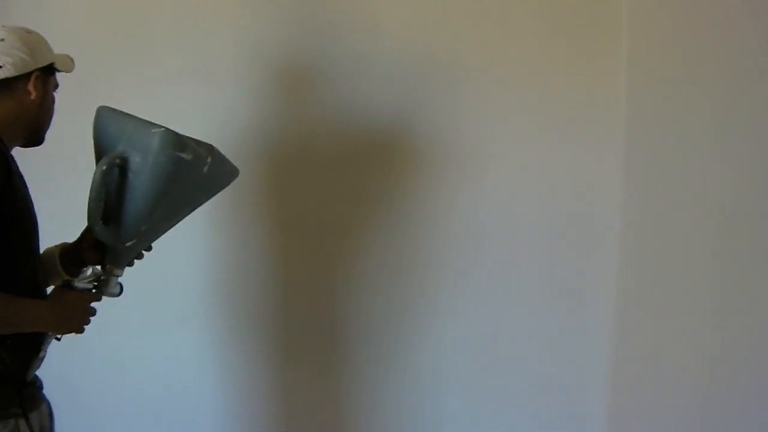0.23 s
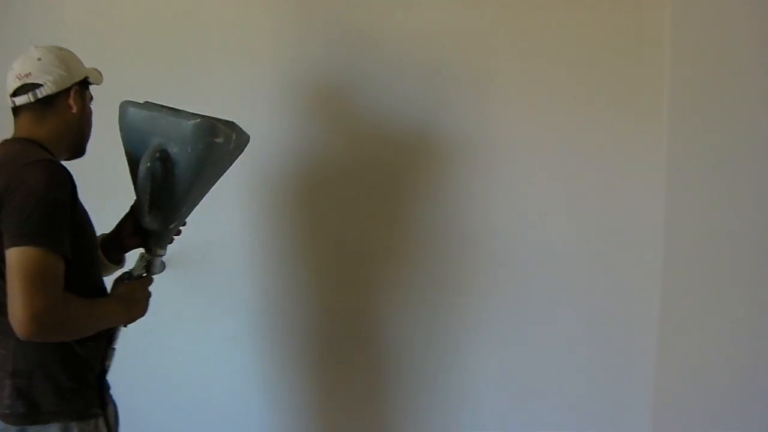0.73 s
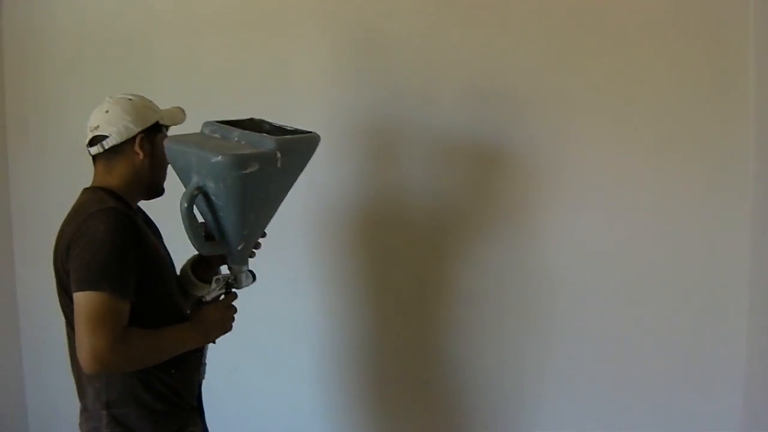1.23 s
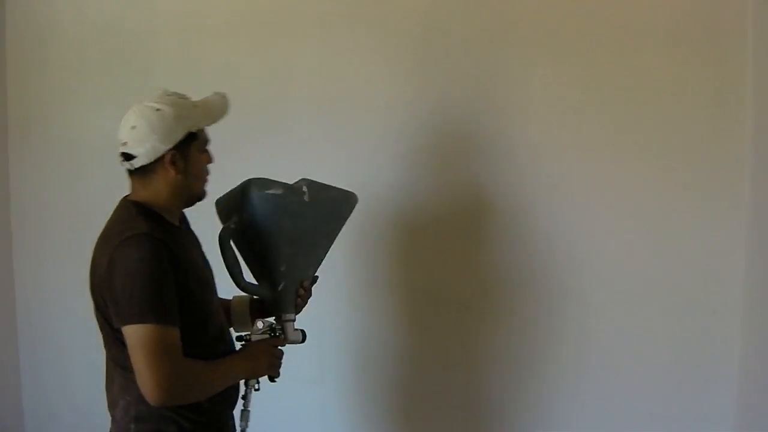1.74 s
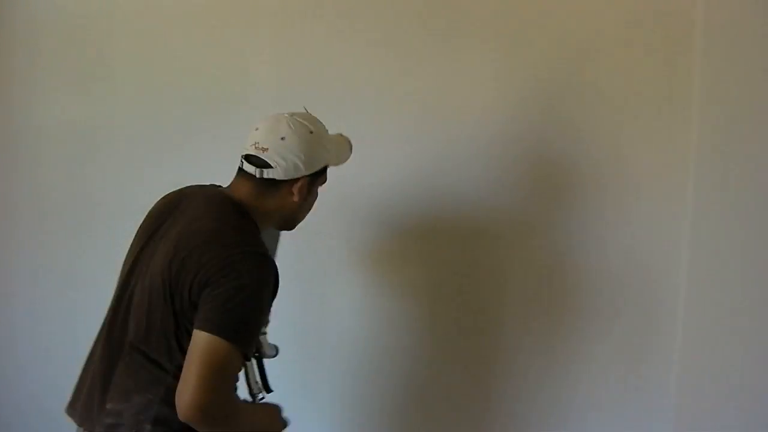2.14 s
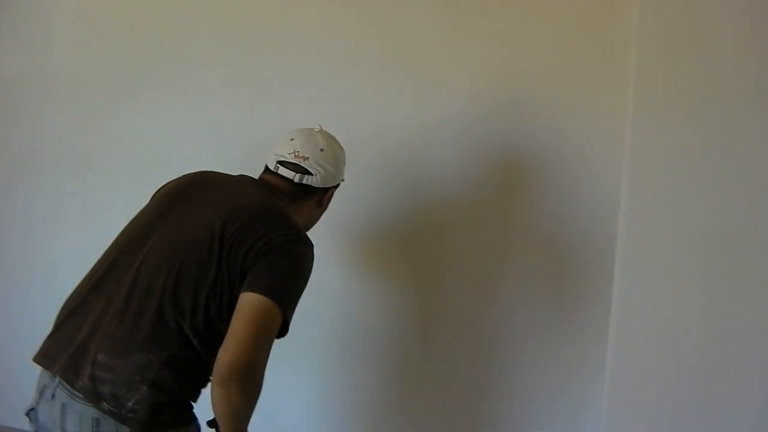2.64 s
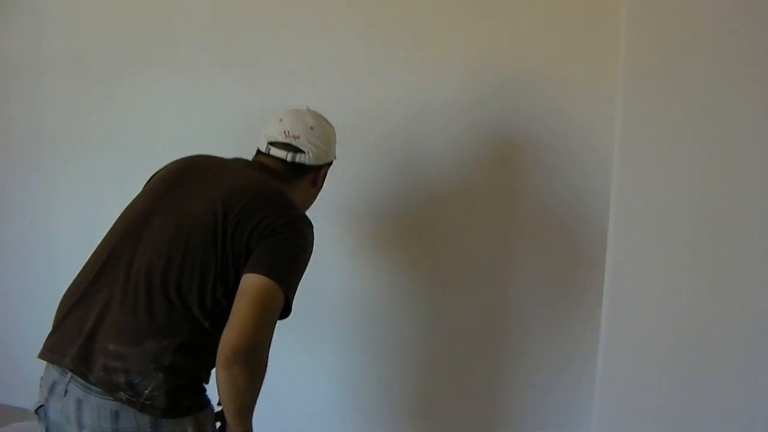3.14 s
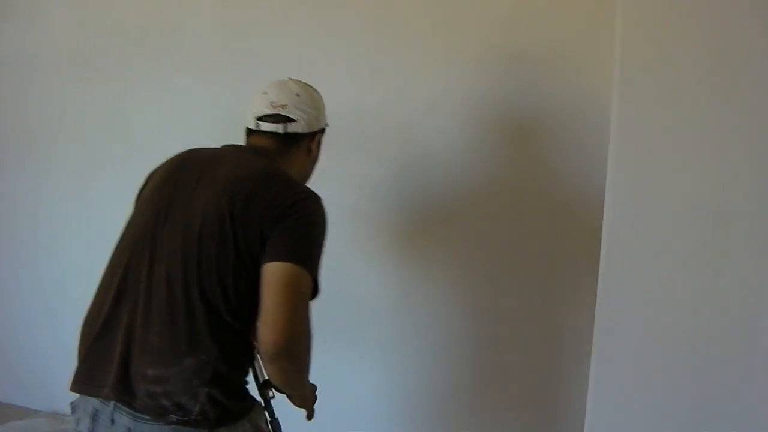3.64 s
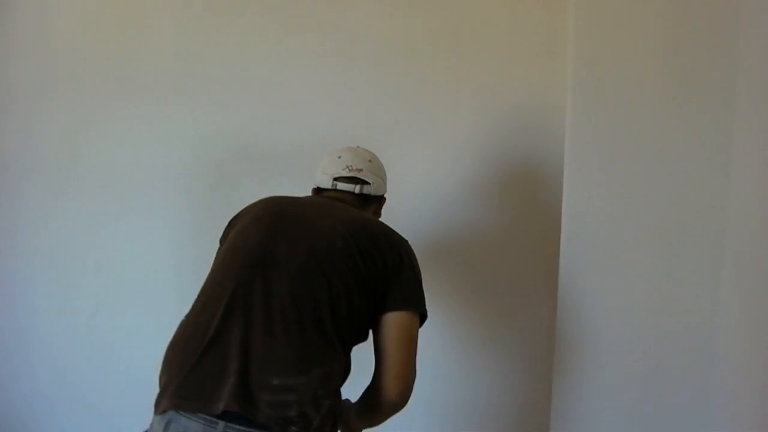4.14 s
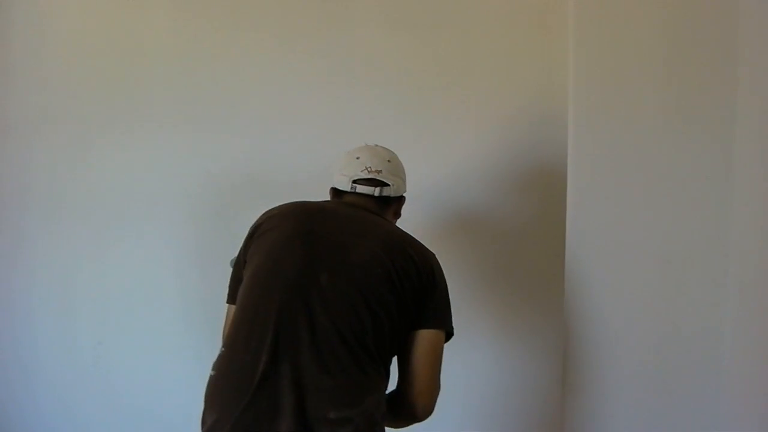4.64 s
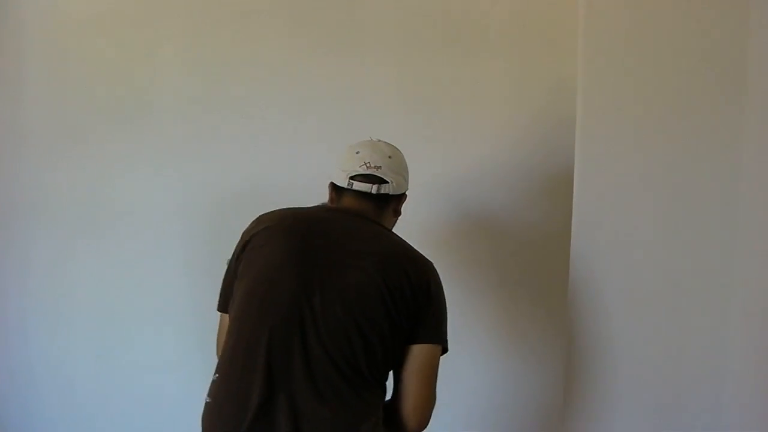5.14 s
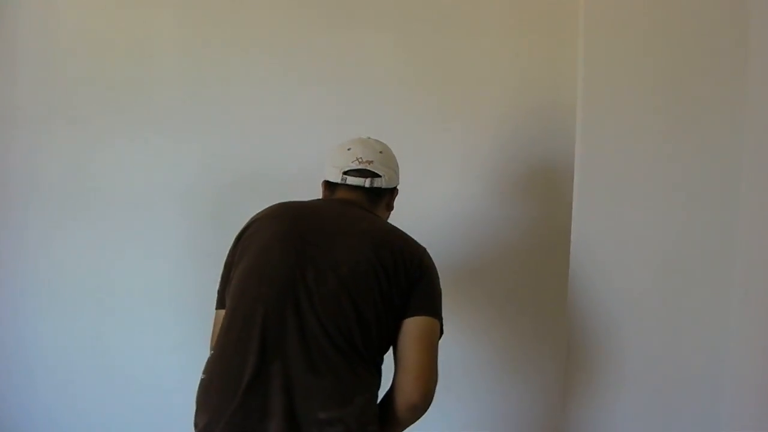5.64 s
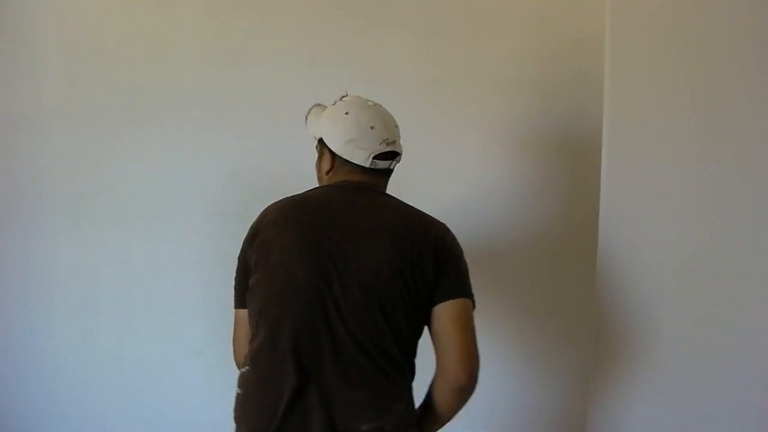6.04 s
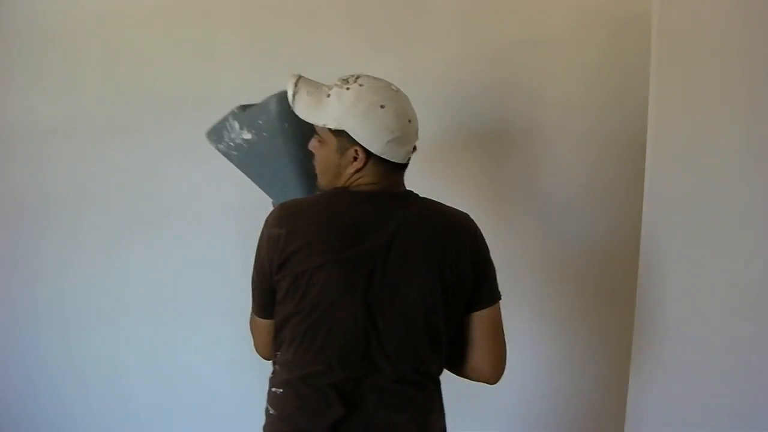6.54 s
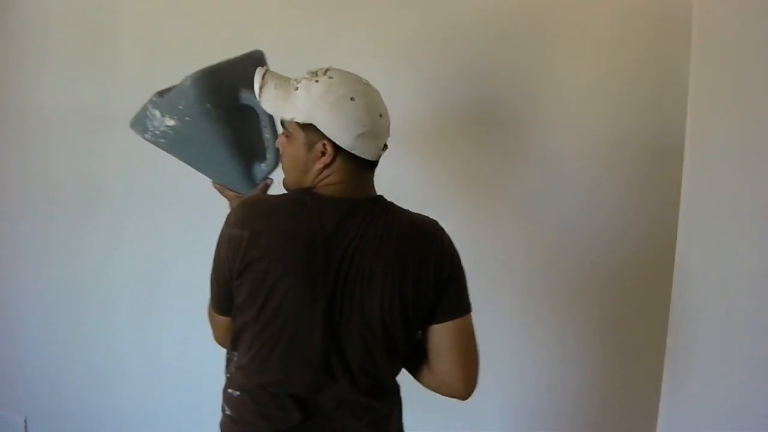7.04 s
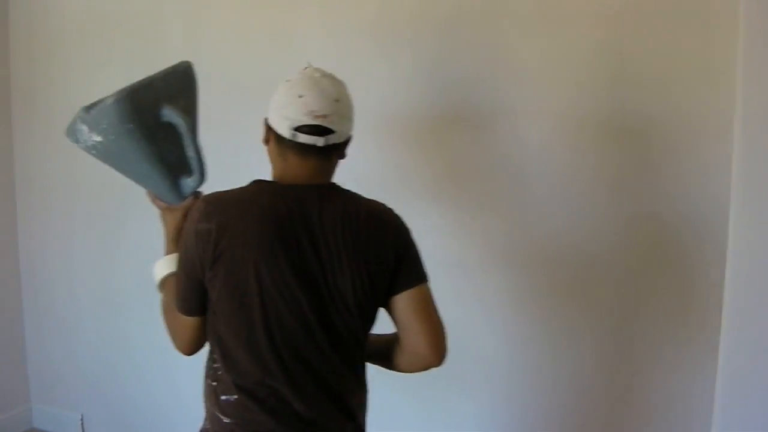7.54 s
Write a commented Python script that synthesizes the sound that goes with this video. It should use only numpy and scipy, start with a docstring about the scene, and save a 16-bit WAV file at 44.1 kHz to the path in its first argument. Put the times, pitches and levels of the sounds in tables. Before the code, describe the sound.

Compressed air hisses loudly from a texture spray gun in a bare echoing room, roughening with each trigger pull, then cutting off with a clunk.

```python
"""A rough rush falls back to a hiss: a hopper gun is spraying drywall texture in a bare room, a few steps away.
Compressed air hisses from the nozzle as shaped noise; each trigger pull adds mud, a fuller and rougher noise.
Mud left in the nozzle thins the hiss until the air has blown it clear, and fuzzy tones whistle now and then.
Bumps of the plastic hopper scuff and ring; at last the air valve shuts with a clunk and the room rings out.
A patchy, very faint low rumble and a faint steady hiss lie underneath."""
import sys
import numpy as np
from scipy import signal
from scipy.fft import rfft, irfft, next_fast_len
from scipy.io import wavfile

SR = 44100
rng = np.random.default_rng(int(sys.argv[2]) if len(sys.argv) > 2 else 0)


def dump(signal):
    """Clip the signal to [-1, 1] and save it as 16-bit WAV at the path in sys.argv[1]."""
    limited = np.clip(np.atleast_2d(signal).T, -1, 1)
    pcm = np.round(limited * 32767).astype(np.int16)
    wavfile.write(sys.argv[1], SR, pcm)


N = 343539

# Pulls of the trigger: start t/s, release t/s, mud flow level/dB, air spurt at the start level/dB
TRIGGER_PULLS = [(-.2, 0, 3.5, 10), (0.557, 1.078, -1, 1), (4.425, 4.86, -.3, 1.5),
                 (5.147, 5.784, -1.65, 1.5)]
# The jet's hiss without its crest: f/Hz, level/dB per Hz
AIR_SPECTRUM = [(100, -47), (260, -40), (380, -29.5), (700, -29.5), (1100, -26.5), (1900, -21.5),
                (2900, -16.5), (4300, -14.5), (5600, -10.5), (7100, -4.5), (10500, -3.5), (15000, -4)]
# Mud being torn into droplets: f/Hz, level/dB per Hz
MUD_SPECTRUM = [(100, -48), (260, -33.5), (400, -26.5), (1100, -23), (2100, -13.5), (3200, -11.5),
                (4600, -5), (6300, -0.5), (7500, -1.5), (9000, -5.5), (11500, -6), (14500, -5)]
# The worker carries the gun along the wall: t/s, change of the hiss level/dB, left minus right level/dB
WALK_ALONG_WALL = [(0, 0.4, 0.2), (2, 0, 0), (4, -0.36, -0.1), (5.3, -0.3, 0), (5.7, 0, 0.2),
                   (7.2, -0.2, .5)]
# Fuzzy tones of air in the nozzle and hopper throat: middle t/s, half-length t/s, f/Hz, spread f/Hz, level/dB
WHISTLE_TONES = [(3.7, 0.35, 493, 20, -63.5), (4.9, 0.096, 388, 17, -57.5), (5.55, 0.48, 396, 9.2, -62.5),
                 (6.353, 0.21, 1602, 350, -52), (7.104, 0.1, 2650, 200, -51),
                 (7.206, 0.037, 2950, 110, -44)]
# What the gun rings with as the valve shuts: f/Hz, level/dB, time to fall by 60 dB t/s
CLUNK_RINGS = [(199, -72, 1), (328, -59, 1.4), (500, -61, .9), (654, -65, .9), (2890, -45, .2)]
# Knocks on the gun: bumps of the hopper, and at the end the clunk of the valve:
# t/s, level/dB, hardness as contact noise level/dB
KNOCKS = [(2.271, -71, 9), (3.879, -50, 3), (4.192, -43, -12), (4.239, -47, -14), (4.28, -47, -18),
          (7.15, -63.5, 21.5), (7.169, -57, 20), (7.199, -57.5, 17), (7.217, -64, 18)]
# Ringing tones of a knock: f/Hz, level/dB, time to fall by 60 dB t/s
KNOCK_RINGS = [(151, -21, 0.12), (290, -16, 0.11), (329, -19, .7), (340, -3, 0.14), (374, -6, 0.1),
               (531, -15, 0.23), (652, -20, .3), (844, -21, 0.17)]
# Dull contact noise of a knock: f/Hz, level/dB per Hz
CONTACT_SPECTRUM = [(30, -24), (70, -17), (150, -8), (330, 0), (600, -0.5), (900, -2.5), (1600, -4.5),
                    (2500, 0.5), (4000, -8), (9000, -35)]
# Patchy low rumble: f/Hz, level/dB per Hz
LOW_RUMBLE_SPECTRUM = [(15, -32), (30, 10.5), (48, -5), (75, 7), (130, 7), (200, 0.5), (400, -32),
                       (1500, -68)]
# Faint steady background: f/Hz, level/dB per Hz
BACKGROUND_SPECTRUM = [(30, -28), (75, -15), (150, -11), (260, -18), (450, 1.5), (800, -3.5), (15500, -5.5)]
# How long the room rings: f/Hz, time to fall by 60 dB t/s
ROOM_DECAY = [(100, 0.94), (400, 1), (1500, 0.96), (4000, 0.87), (7000, 0.7), (10000, 0.57), (15000, 0.36)]
# Difference between the two microphones: f/Hz, side minus mid level/dB
STEREO_WIDTH = [(60, -9), (200, -9.5), (380, -10.5), (700, -13.5), (1400, -14), (2400, -14), (4400, -8.6),
                (8000, -4.2), (14000, -3.8)]

PULL_S, RELEASE_S, SPURT_S = 0.058, 0.12, 0.17  # mud flow starts, stops; half-length of the air spurt
JET_DB, MUD_DB = -18, -17.5  # air through a clean nozzle; mud at a flow of 1
COAT_S, CLEAR_S = 0.16, 1.07  # mud coats the nozzle quickly and is blown off slowly
CLEAN_CREST_HZ, COATED_CREST_HZ = 7440, 8350  # a narrower opening hisses higher
COATED_DB, COATED_BODY_DB = -4, -1.7  # and more weakly
CREST_WIDTH_HZ, CREST_DB = 850, 4
BODY_HZ, BODY_WIDTH_HZ = 2900, 1700
SHUT_S, SHUT_FALL_DB = 7.184, 225  # the valve closes; the hose empties at this many dB a second
BACKGROUND_DB = -58.5
TREBLE_LIMIT_HZ = 15770

TIME = np.arange(N) / SR
FRAME_S = np.arange(N // 128 + 5) * 128 / SR  # times of the short frames that shape the hiss
BIN_HZ = np.fft.rfftfreq(512, 1 / SR)  # frequencies within each frame


def air_jet(flutter_db=0.8, choke_db=1.4, choke_body_db=2):
    """Turbulent hiss that spurts as the trigger is pulled; mud in the nozzle makes it higher and thinner."""
    coat, flow = coating(), mud_flow()
    frame_coat = np.interp(FRAME_S, TIME, coat)[:, None]
    frame_flow = np.interp(FRAME_S, TIME, flow)[:, None]
    crest_hz = CLEAN_CREST_HZ + (COATED_CREST_HZ - CLEAN_CREST_HZ) * frame_coat
    body_db = COATED_BODY_DB * frame_coat - choke_body_db * frame_flow
    shape_db = CREST_DB * hump(crest_hz, CREST_WIDTH_HZ) + body_db * hump(BODY_HZ, BODY_WIDTH_HZ)
    # Random frames are shaped one by one, then overlapped into a continuous hiss
    real, imag = rng.standard_normal((2,) + shape_db.shape)
    frames = (real + 1j * imag) * amp(shape_db)
    hiss = signal.istft(frames.T, noverlap=384)[1][:N]
    spurt_db = np.zeros(N)
    for start, _, _, db in TRIGGER_PULLS:
        spurt_db += db * np.exp(-((TIME - start - PULL_S) / SPURT_S) ** 2)
    level_db = JET_DB + at_time(WALK_ALONG_WALL, TIME) + COATED_DB * coat - choke_db * flow + spurt_db
    return unit(colour(hiss, AIR_SPECTRUM)) * amp(level_db + flutter_db * wander(hz=25))


def mud_spray(sputter_db=1.5):
    """Mud reaches the jet in uneven lumps and is torn apart."""
    lumps = unit(noise(MUD_SPECTRUM) * amp(sputter_db * wander(hz=44.6)))
    return amp(MUD_DB) * mud_flow() * lumps


def pull(start, stop):
    """Mud flow of one trigger pull: it rises, holds and falls away."""
    rise = np.clip((TIME - start) / PULL_S, 0, 1)
    fall = np.clip(1 - (TIME - stop) / RELEASE_S, 0, 1)
    return rise * fall


def mud_flow():
    """Flow of mud into the jet over all pulls; a pull at 0 dB reaches 1."""
    return sum(amp(db) * pull(start, stop) for start, stop, db, _ in TRIGGER_PULLS)


def coating():
    """Mud in the nozzle, 0-1: it builds up during each pull and clears after it."""
    coats = []
    for start, stop, _, _ in TRIGGER_PULLS:
        build = 1 - np.exp(-np.maximum(TIME - start, 0) / COAT_S)
        clear = np.exp(-np.maximum(TIME - stop - RELEASE_S, 0) / CLEAR_S)
        coats.append(build * clear)
    return np.max(coats, axis=0)


def valve():
    """Air pressure as a gain: full until the valve shuts, then draining away."""
    return amp(-SHUT_FALL_DB * np.maximum(TIME - SHUT_S, 0))


def whistles():
    """Air catches an edge of the nozzle and briefly sings in a fuzzy band."""
    out = np.zeros(N)
    for middle, half_length, hz, spread_hz, db in WHISTLE_TONES:
        tone = unit(wander(hz=spread_hz) * np.cos(2 * np.pi * hz * TIME))
        out += amp(db) * tone * np.exp(-((TIME - middle) / half_length) ** 2)
    return out


def clunk(lead_s=0.008):
    """The valve snaps onto its seat, just before the pressure falls, and the gun rings in fading tones."""
    t = np.maximum(TIME - SHUT_S + lead_s, 0)
    return sum(amp(db - 60 * t / t60) * np.sin(2 * np.pi * hz * t) for hz, db, t60 in CLUNK_RINGS)


def knocks(contact_t60=0.082, give_s=0.0035):
    """Each knock on the gun is a short scuff with fading ringing tones; it starts softly."""
    out, t = np.zeros(N), np.arange(SR // 2) / SR
    ring = sum(amp(db - 60 * t / t60) * np.sin(2 * np.pi * hz * t) for hz, db, t60 in KNOCK_RINGS)
    soft_start = 1 - np.exp(-t / give_s)
    for s, db, hard_db in KNOCKS:
        contact = unit(colour(rng.standard_normal(len(t)), CONTACT_SPECTRUM))
        scuff = contact * amp(-60 * t / contact_t60)
        add(out, s, amp(db) * (ring + amp(hard_db) * scuff) * soft_start)
    return out


def low_rumble(level_db=-72.5, rush_db=7, swell_db=7, fade_db_per_s=20):
    """Patchy low rumble, very faint, louder during the rushes and fading after the valve shuts."""
    swells = np.minimum(wander(hz=7.3), 1)
    patches = unit(noise(LOW_RUMBLE_SPECTRUM) * amp(swell_db * swells))
    fade_db = fade_db_per_s * np.maximum(TIME - SHUT_S, 0)
    return patches * amp(level_db + rush_db * mud_flow() - fade_db)


def background():
    """Faint steady noise with a fixed spectrum."""
    return amp(BACKGROUND_DB) * noise(BACKGROUND_SPECTRUM)


def echoes():
    """Dense reflections off bare walls; the treble dies first, but every band carries equal energy."""
    hz, t, grains = signal.stft(rng.standard_normal(SR * 3 // 4), SR, nperseg=256)
    t60 = at_hz(ROOM_DECAY, hz)[:, None]
    tail = signal.istft(grains * amp(-60 * t / t60) / np.sqrt(t60))[1]
    return tail / np.linalg.norm(tail)


def plume_in_room(x, direct_db, count=10):
    """Mid and side of the spray; the plume keeps shifting, so one echo pattern fades quickly into the next."""
    turns = TIME / 0.04  # a new pattern fades in every 0.04 s
    mid, side = amp(direct_db) * x, np.zeros(N)
    for k in range(count):
        visit, place = np.divmod(turns + k, count)
        # A random sign each time a pattern comes round keeps it from simply repeating
        signs = rng.choice([-1, 1], int(visit[-1]) + 1)
        polarity = signs[visit.astype(int)]
        here = x * polarity * np.sin(np.pi / 2 * np.minimum(place, 2))
        mid = mid + signal.oaconvolve(here, echoes())[:N]
        side += signal.oaconvolve(here, echoes())[:N]
    return np.array([mid / np.sqrt(1 + amp(direct_db) ** 2), colour(side, STEREO_WIDTH)])


def body_in_room(x, echo_db):
    """Mid and side of a compact source, such as the gun's body, with one steady echo pattern."""
    mid = x + amp(echo_db) * signal.oaconvolve(x, echoes())[:N]
    side = signal.oaconvolve(x, echoes())[:N]
    return np.array([mid, colour(side, STEREO_WIDTH)])


def amp(db):
    """Turns decibels into gain."""
    return 10 ** (np.asarray(db) / 20)


def unit(x):
    """Scales a sound to an rms of 1."""
    return x / np.sqrt(np.mean(x ** 2) + 1e-20)


def at_hz(points, hz):
    """Reads a spectrum on a log-frequency axis."""
    f, value = np.transpose(points)
    return np.interp(np.log(hz + 1), np.log(f + 1), value)


def at_time(points, t, axis=1):
    """Reads one column of a curve over time."""
    columns = np.transpose(points)
    return np.interp(t, columns[0], columns[axis])


def add(mix, s, sound):
    """Mixes a sound in, starting at s seconds."""
    part = mix[round(s * SR):][:len(sound)]
    part += sound[:len(part)]


def colour(x, points):
    """Filters a sound by a spectrum."""
    size = next_fast_len(len(x))
    gain = amp(at_hz(points, np.fft.rfftfreq(size, 1 / SR)))
    return irfft(rfft(x, size) * gain, size)[:len(x)]


def noise(points):
    """Steady noise of a given spectrum."""
    return unit(colour(rng.standard_normal(N), points))


def wander(hz):
    """Random drift, up to about hz changes a second."""
    size = next_fast_len(N)
    f = np.fft.rfftfreq(size, 1 / SR)
    slow = rfft(rng.standard_normal(size)) / (1 + (f / hz) ** 2)
    return unit(irfft(slow, size)[:N])


def hump(hz, width_hz):
    """A broad bell along the frequency axis."""
    return np.exp(-0.5 * ((BIN_HZ - hz) / width_hz) ** 2)


def scene():
    """Spray, knocks and gun in the room, over the low rumble and a faint background, as left and right."""
    plume = plume_in_room((air_jet() + mud_spray()) * valve(), direct_db=-4)
    knocking = body_in_room(knocks(), echo_db=5)
    gun = body_in_room(whistles() + clunk(), echo_db=-4)
    mid, side = plume + knocking + gun
    mid = mid + low_rumble() + background()
    side = side + amp(-13) * low_rumble() + colour(background(), STEREO_WIDTH)
    lean = amp(at_time(WALK_ALONG_WALL, TIME, axis=2) / 2)  # half the difference goes to each ear
    return np.array([(mid + side) * lean, (mid - side) / lean])


def record(dry):
    """The microphones' treble limit: a steep low-pass filter."""
    low_pass = signal.firwin(1023, TREBLE_LIMIT_HZ, window=("kaiser", 9), fs=SR)
    return signal.oaconvolve(dry, low_pass[None], "same")


dry = scene()
out = record(dry)
dump(out)
```